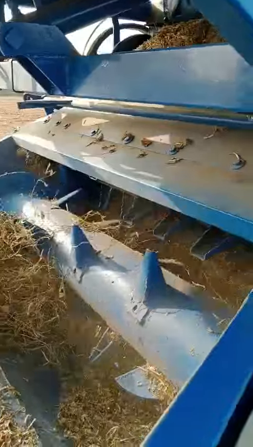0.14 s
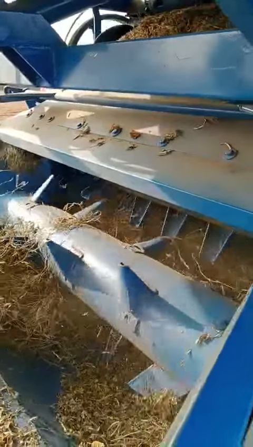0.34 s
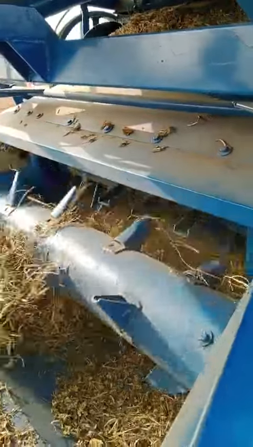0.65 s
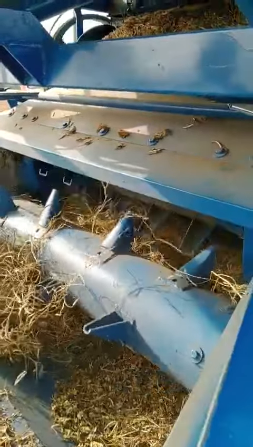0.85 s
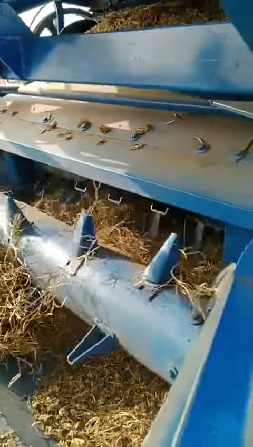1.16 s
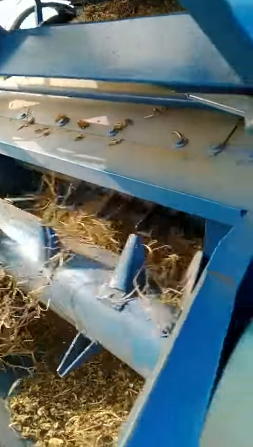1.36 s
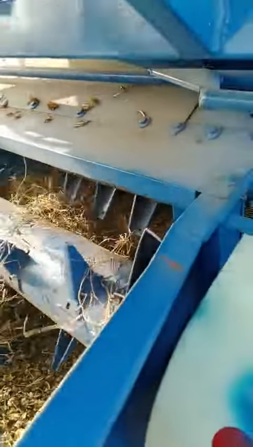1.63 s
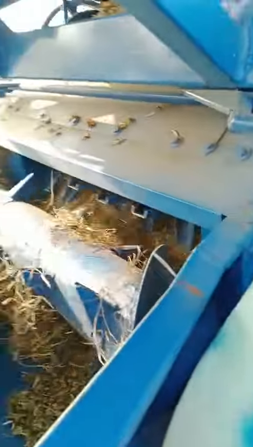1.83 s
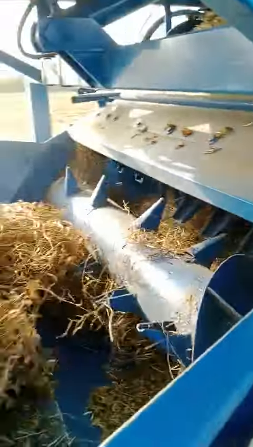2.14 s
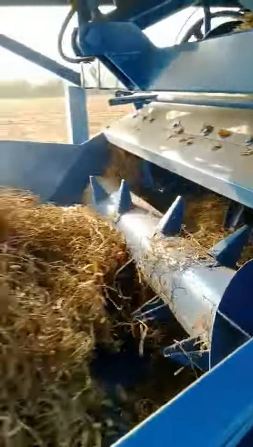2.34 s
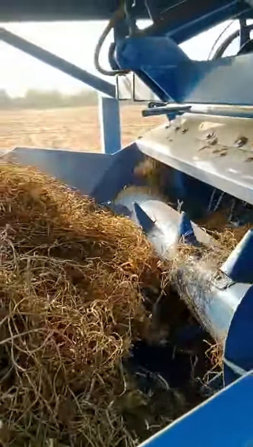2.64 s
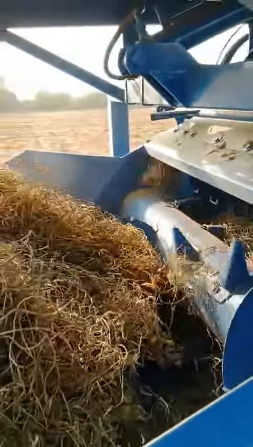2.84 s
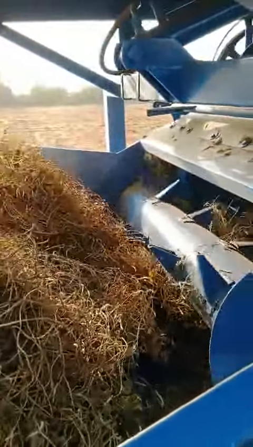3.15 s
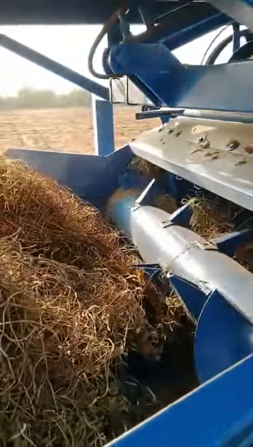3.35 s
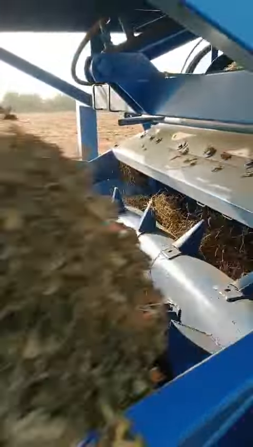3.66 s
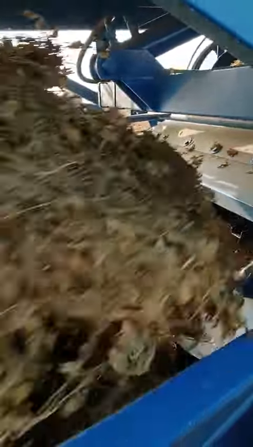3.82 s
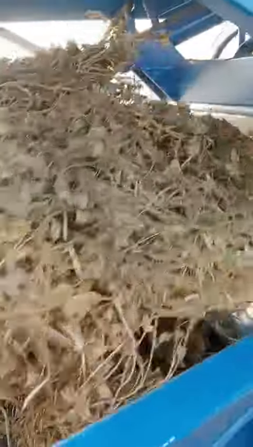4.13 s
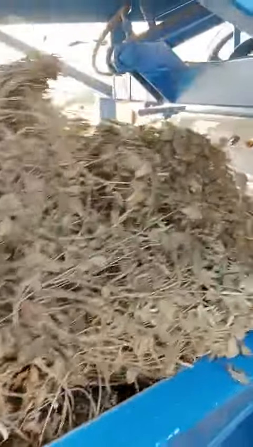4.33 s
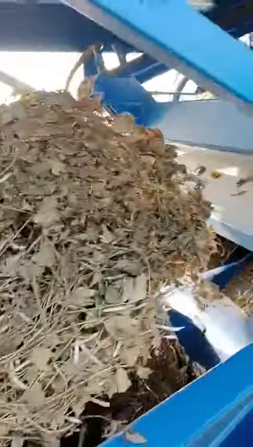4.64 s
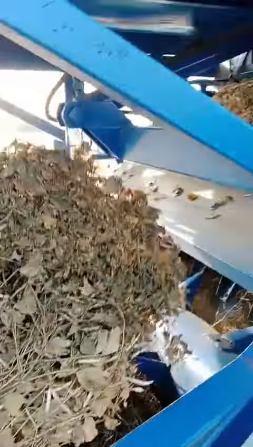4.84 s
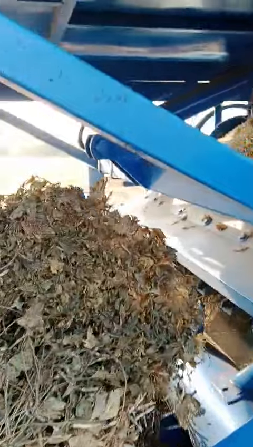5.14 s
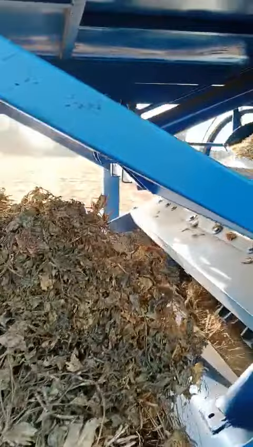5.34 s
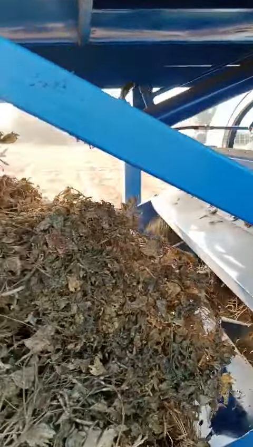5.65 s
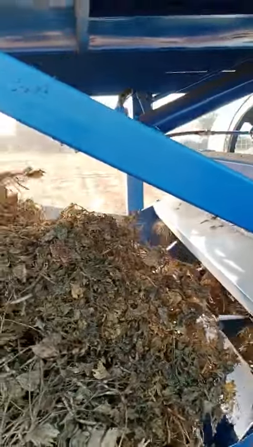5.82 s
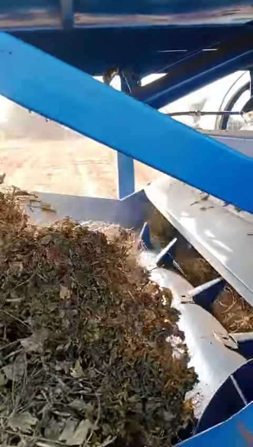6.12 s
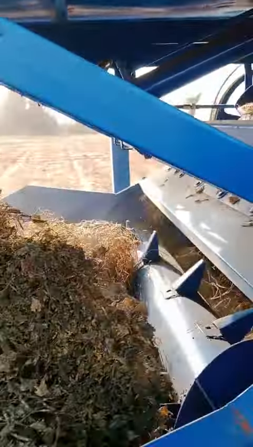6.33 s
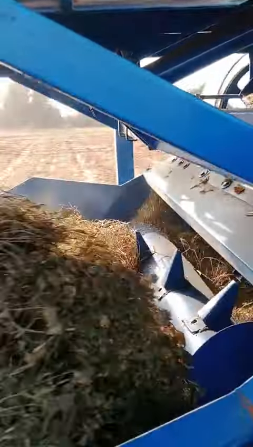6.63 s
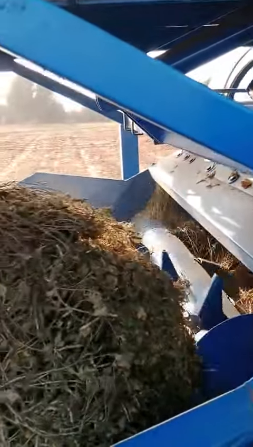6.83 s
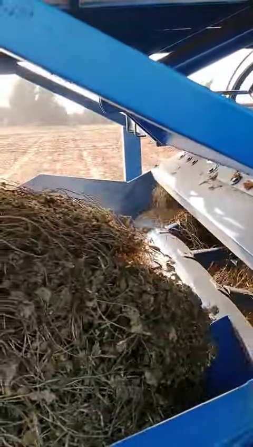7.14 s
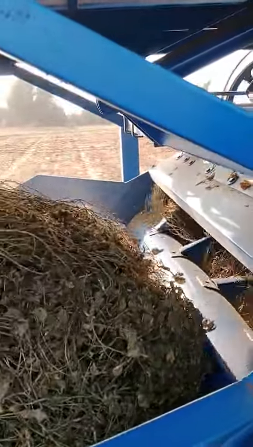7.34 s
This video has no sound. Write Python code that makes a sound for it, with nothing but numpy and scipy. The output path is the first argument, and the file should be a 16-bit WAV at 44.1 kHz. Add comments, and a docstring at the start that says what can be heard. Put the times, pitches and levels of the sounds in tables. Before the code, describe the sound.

Close to the feed opening of a threshing machine, outdoors with no echo, a continuous churning roar sits on a low diesel drone and a ringing metal hum. Early on, stalks snap and clods clack against the steel roller. Dry stems and leaves slide in with a brief rustle midway, then the drum works harder, with more thumps and clanks. A flickering hiss of chaff carries on throughout.

```python
"""Thresher in an open field

A tractor-driven thresher, heard close up from its feed tray. Under it all the blower rumbles,
the diesel drones, the shafts hum and the steel hood booms. Chaff hisses, an armful rustles in,
stalks crack, stems clank on the sieve and clods clack on the feed roller.
In front, crop roars through the drum, thumping the casing and setting its panels ringing."""
import sys
import numpy as np
from scipy import signal
from scipy.fft import rfft, irfft
from scipy.io import wavfile

SR = 44100
rng = np.random.default_rng(int(sys.argv[2]) if len(sys.argv) > 2 else 0)


def log_audio(samples):
    """Write samples as a 16-bit WAV file to the path given in sys.argv[1]."""
    # one column per channel
    frames = np.atleast_2d(samples).T
    # limit to full scale, then quantise
    limited = np.clip(frames, -1, 1)
    pcm = np.round(limited * 32767).astype(np.int16)
    wavfile.write(sys.argv[1], SR, pcm)


N = 329868
TIME = np.arange(N) / SR
FREQ = np.arange(N // 2 + 1) * SR / N


def undb(db):
    """Decibels to gain."""
    return 10 ** (np.asarray(db) / 20)


def unit(x):
    """Scale to rms 1."""
    return x / np.sqrt(np.mean(x ** 2))


def curve(table):
    """Automation: straight lines through (time, value) points."""
    return np.interp(TIME, *np.transpose(table))


def colour(x, spectrum):
    """EQ x through (frequency, gain) points, at rms 1."""
    hz, db = np.transpose(spectrum)
    gain = undb(np.interp(np.log(FREQ + 1), np.log(hz), db))
    return unit(irfft(rfft(x) * gain, N))


def walk(rate):
    """Smooth random motion at rms 1, changing about rate times a second."""
    return unit(irfft(rfft(rng.standard_normal(N)) * np.exp(-(FREQ / rate) ** 2), N))


def grains(rate, spread_db):
    """Tiny random impacts, rate a second, scattered in size by spread_db."""
    size = undb(spread_db * np.minimum(rng.exponential(size=N), 4))
    hits = rng.random(N) < rate / SR
    return unit(hits * size * np.sign(rng.standard_normal(N)))


def tone(hz, drift_hz, flutter_db):
    """A machine tone, a little unsteady in pitch and level."""
    phase = np.cumsum(hz + drift_hz * walk(4.01)) / SR + rng.random()
    return unit(np.sin(2 * np.pi * phase) * undb(flutter_db * walk(2.1)))


def swells(table, half_s):
    """Envelope of bell-shaped swells around (time, level) peaks."""
    return sum(undb(db) * np.exp(-((TIME - s) / half_s) ** 2) for s, db in table)


def bursts(times, levels_db, lengths, rise_s):
    """Envelope of brief bursts: each builds, holds for its length and dies away."""
    envelope = np.zeros(N)
    for s, db, length in zip(times, levels_db, lengths):
        age = np.maximum(TIME - s, 0)
        envelope += undb(db) * (1 - np.exp(-age / rise_s)) / (1 + (age / length) ** 3)
    return envelope


def ring(x, modes):
    """Steel driven by x rings in its (frequency, width, level) modes, at rms 1."""
    response = sum(undb(db) * 1j * FREQ * width / (hz ** 2 - FREQ ** 2 + 1j * FREQ * width)
                   for hz, width, db in modes)
    return unit(irfft(rfft(x) * response, N))


def strike(modes, length_s):
    """One blow on steel: its modes start together and die away."""
    age = TIME[TIME < length_s]
    return sum(undb(db) * np.exp(-np.pi * width * age) * np.sin(2 * np.pi * hz * age)
               * rng.choice([-1, 1]) for hz, width, db in modes)


def add(out, s, sound):
    """Mix a sound into out at s seconds."""
    start = int(s * SR)
    out[start:start + len(sound)] += sound[:N - start]


# Low, airy body of the blower: (frequency [Hz], gain [dB])
BLOWER_EQ = [(20, -52), (42, -35), (62, -12), (85, -7.5), (120, -2.5), (240, -2.5), (320, -2), (430, -11),
             (700, -18.5), (2000, -38)]
# Fader ride on its rumble: (time [s], level [dB])
BLOWER_LEVEL = [(0, -23), (.33, -22.5), (.45, -23.5), (.56, -19.5), (.85, -21), (1.15, -24.5), (2.9, -26.5),
                (5.3, -25), (6.1, -23.5), (7.48, -22.5)]

def blower(firing_hz, cylinders=4, throb_db=1):
    """Churned air rumbles, throbbing once in each engine cycle."""
    cycle = np.cumsum(firing_hz) / SR / cylinders
    throb = undb(throb_db * np.cos(2 * np.pi * cycle))
    return undb(curve(BLOWER_LEVEL)) * colour(rng.standard_normal(N) * throb, BLOWER_EQ)


# Slight wander of the engine speed: (time [s], firing rate [Hz])
FIRING_RATE = [(0, 50.8), (2.5, 50.98), (3.6, 50.65), (4.6, 51.07), (5.9, 50.94), (7.48, 50.54)]
# Harmonics of the drone: (multiple of the firing rate, level [dB])
EXHAUST_HARMONICS = [(1, -40.5), (2, -41), (3, -30.5), (4, -40), (5, -42), (6, -33), (10, -44.5)]
# Fader ride on the drone: (time [s], gain [dB])
EXHAUST_GAIN = [(0, 5), (.65, 3), (1.2, -2), (2.2, -3.5), (3.2, -1), (3.9, 0), (5.1, -4), (6.1, 4.5),
                (7.48, -1)]

def diesel(firing_hz):
    """The muffled exhaust drones on low harmonics of the firing rate."""
    drone = sum(undb(db) * tone(k * firing_hz, drift_hz=0.092 * k, flutter_db=3)
                for k, db in EXHAUST_HARMONICS)
    return undb(curve(EXHAUST_GAIN)) * drone


# Hum of the turning parts: (frequency [Hz], level [dB])
SHAFT_TONES = [(58.5, -47.5), (82.8, -37.5), (139.3, -39.5), (178.3, -44), (302, -42.5), (335, -36.5)]

def shafts():
    """The belt-driven drum, fans and shafts hum, each at its own pitch."""
    return sum(undb(db) * tone(hz, drift_hz=0.00374 * hz, flutter_db=4) for hz, db in SHAFT_TONES)


# Sustained boom of the hood: (time [s], level [dB])
HOOD_LEVEL = [(0, -28), (1.1, -34), (2.6, -31.5), (2.9, -30.5), (4.7, -31), (5.1, -29.5), (5.9, -32),
              (6.7, -27.5), (7.48, -34.5)]
# Close tones that beat inside the boom: (frequency [Hz], relative level [dB])
HOOD_TONES = [(356.6, 3.5), (369.5, -1)]
# The hood swelling into resonance: (peak time [s], level [dB])
HOOD_SURGES = [(.075, -24), (2.92, -21), (3.19, -20.5), (3.385, -18.5), (3.52, -22), (3.72, -23),
               (3.815, -20), (3.975, -19.5), (4.22, -21), (4.29, -23.5), (4.38, -19), (4.535, -22),
               (4.69, -19), (4.785, -20.5), (5.39, -24.5), (6.94, -23)]

def hood():
    """Shaken by the shafts, the hood booms: its main tone surges while close tones beat against it."""
    boom_db = curve(HOOD_LEVEL)
    beating = unit(sum(undb(db) * tone(hz, drift_hz=1.19, flutter_db=2.5) for hz, db in HOOD_TONES))
    surging = np.hypot(undb(boom_db - 1), swells(HOOD_SURGES, half_s=0.025))
    return undb(boom_db - 4.5) * beating + surging * tone(366, drift_hz=3.07, flutter_db=1.8)


# Crop dragging along the side panel: (peak time [s], level [dB])
PANEL_DRAGS = [(.79, -22), (1.15, -25.5), (2.28, -23.5), (3.57, -23), (4.30, -30), (5.18, -25),
               (6.56, -20.5)]

def side_panel(load_db):
    """Sheet steel sings one low note under load, swelling as crop drags along it."""
    envelope = np.hypot(undb(-36 + 0.58 * load_db), swells(PANEL_DRAGS, half_s=0.041))
    return envelope * tone(252.2, drift_hz=2.665, flutter_db=1.5)


# Fader ride on the chaff: (time [s], level [dB])
CHAFF_LEVEL = [(0, -33), (1.15, -35.5), (1.45, -32.5), (3.05, -37), (3.75, -29.5), (4.15, -35.5),
               (5.3, -38), (5.85, -34.5), (7.48, -34.5)]
# Its dry, wide hiss: (frequency [Hz], gain [dB])
CHAFF_EQ = [(1000, 10), (2600, -8.5), (3400, -1.5), (4300, -4.5), (5800, -4), (7400, 4.5), (10200, 3.5),
            (13000, 1), (15700, -6)]

def chaff():
    """Dry chaff flies off the drum in a flickering hiss with a faint crackle."""
    hiss = rng.standard_normal(N) + undb(-13) * grains(rate=800, spread_db=3.5)
    return colour(hiss, CHAFF_EQ) * undb(curve(CHAFF_LEVEL) + 3 + walk(22))


# Fade in and out of the armful's slide: (time [s], level [dB])
ARMFUL_LEVEL = [(3.37, -51), (3.46, -30), (3.8, -30), (3.95, -38), (4.2, -60)]
# Colour of its rustle: (frequency [Hz], gain [dB])
ARMFUL_EQ = [(300, -13), (800, 16), (1200, 10), (2500, -6), (3500, -2), (6000, -7), (10000, 7), (15500, -4)]

def armful():
    """Stems scrape and dry leaves rustle as a fresh armful slides onto the tray."""
    rustle = grains(rate=1600, spread_db=3) * undb(1.5 * walk(25))
    return undb(curve(ARMFUL_LEVEL)) * colour(rustle, ARMFUL_EQ)


# Stalks cracking in the feed: (time [s], snap level [dB], crunch level [dB], length [s])
STALK_CRACKS = [(0.123, -30, -43, 0.018), (0.471, -21.5, -19, 0.023), (0.5, -45, -33, 0.035),
                (0.933, -26, -27, 0.027), (1.988, -30, -50, 0.0048), (2.729, -29, -39, 0.013),
                (3.416, -27, -28, 0.012), (3.61, -24, -36, 0.004), (3.788, -17, -45, 0.002),
                (4.261, -29, -45, .003), (4.66, -33, -33, 0.017), (4.96, -38, -35, 0.041),
                (5.833, -31, -27, 0.029), (5.872, -21.5, -23.5, 0.02), (6.511, -28.5, -31, 0.023),
                (7.079, -28, -31, 0.024), (7.372, -35, -27.5, 0.028)]
# Bright top of a crack: (frequency [Hz], gain [dB])
SNAP_EQ = [(1500, -42), (4000, 4.5), (7500, 7), (11000, 7), (16000, -1.5)]
# Dull body of a crack: (frequency [Hz], gain [dB])
CRUNCH_EQ = [(300, 12), (900, 7.5), (2000, -5), (3600, 5), (6000, -6), (16000, -42)]

def stalks():
    """A breaking stalk is a tight burst of splinters: a bright snap over a dull crunch."""
    times, snap_db, crunch_db, lengths = np.transpose(STALK_CRACKS)
    bright = colour(grains(rate=5400, spread_db=0.5), SNAP_EQ)
    dull = colour(grains(rate=5000, spread_db=1.5), CRUNCH_EQ)
    snaps = bursts(times, snap_db + 1.5, lengths, rise_s=0.0021) * bright
    crunches = bursts(times, crunch_db + 2, lengths, rise_s=0.0052) * dull
    return snaps + crunches


# Ring of a sieve bar: (multiple of its pitch, width [Hz], level [dB])
BAR_MODES = [(0.27, 70, -4.5), (0.56, 60, -4), (0.78, 65, -1.5), (0.89, 130, -6), (1, 45, -2.5),
             (1.09, 110, -10), (1.5, 65, -7.5), (1.73, 120, -19)]

def clank(pitch_hz, bounces=4, gap_s=0.0058, step_db=-1.5, detune=0.018):
    """A stem skips along a sieve bar in weakening bounces, each at a slightly different pitch."""
    out = np.zeros(SR // 8)
    gaps = gap_s * rng.uniform(0.6, 1.4, size=bounces)
    for k, s in enumerate(np.cumsum(gaps) - gaps[0]):
        hz = pitch_hz * (1 + detune * rng.uniform(-1.04, 1))
        modes = [(multiple * hz, width, db) for multiple, width, db in BAR_MODES]
        add(out, s, undb(k * step_db) * strike(modes, length_s=0.035))
    return out


# Fader ride on the bed of light stems: (time [s], level [dB])
CLATTER_LEVEL = [(0, -34), (1.9, -40.5), (2.7, -41), (3.6, -40), (4.6, -43), (6.0, -43), (7.48, -40)]
# Accents from hard stems: (time [s], level [dB], pitch [Hz])
SIEVE_CLANKS = [(0.475, -21, 2180), (0.638, -27, 2330), (0.936, -23, 2390), (1.055, -24, 2080),
                (1.218, -27, 2350), (1.335, -26, 2170), (1.653, -32, 2160), (3.136, -24, 2010),
                (3.417, -20, 1590), (3.742, -25, 1730), (4.237, -24, 1960), (5.072, -26, 2140),
                (5.632, -23, 2010), (5.78, -30, 2020), (6.06, -26, 2020), (6.259, -22.5, 2020),
                (6.49, -23, 2060), (6.629, -18.5, 2010), (6.685, -32, 2100), (7.253, -21.5, 1940)]

def sieve(stems=260, centre_hz=1594, range_octaves=0.931, range_db=12):
    """Single loud clanks stand out from a loose clatter of lighter stems, each at its own pitch."""
    accents, clatter = np.zeros(N), np.zeros(N)
    for when, strength, pitch in rng.random((stems, 3)):
        pitch_hz = centre_hz * 2 ** (range_octaves * (pitch - 0.5))
        add(clatter, when * N / SR, undb(range_db * strength) * clank(pitch_hz))
    for s, db, pitch_hz in SIEVE_CLANKS:
        add(accents, s, undb(db - 2.7) * clank(pitch_hz))
    return accents + undb(curve(CLATTER_LEVEL)) * unit(clatter)


# Clods hitting a roller spike, some with a rebound: (time [s], level [dB], brightness [Hz])
ROLLER_CLACKS = [(0.474, -18, 7000), (.482, -22, 7000), (.497, -17, 2500), (.553, -16.5, 900),
                 (1.329, -22, 4000), (3.545, -19, 1000), (4.949, -23, 3500), (5.876, -21, 6000),
                 (6.629, -22, 4000), (6.684, -23, 4000)]
# Ring of the feed roller: (frequency [Hz], width [Hz], level [dB])
ROLLER_MODES = [(507, 13, -8.5), (905, 5, -5.5), (1347, 18, -7.5), (1430, 24, -2), (1830, 23, -11),
                (2400, 28, -22), (3225, 40, -11), (3650, 51, -15), (4130, 35, -10)]

def roller():
    """A hard blow rings all the roller's modes in a metal clack; a soft one wakes only the low ones."""
    out = np.zeros(N)
    for s, db, bright_hz in ROLLER_CLACKS:
        modes = [(hz, width, mode_db - 10 * np.log10(1 + (hz / bright_hz) ** 4))
                 for hz, width, mode_db in ROLLER_MODES]
        add(out, s, undb(db) * strike(modes, length_s=0.5))
    return out


# Hits from wads of crop: (time [s], casing level [dB], drum cover level [dB], length [s])
WAD_THUMPS = [(0.058, -25, -28, 0.082), (0.49, -26, -38, 0.099), (0.894, -20.5, -16, 0.061),
              (.934, -24, -30, 0.033), (1.323, -23, -21, 0.023), (1.353, -27.5, -18, 0.039),
              (1.85, -24, -29, 0.059), (1.938, -25, -23, 0.031), (2.703, -26, -20, 0.032),
              (2.727, -24, -21, 0.037), (3.071, -29.5, -23, 0.044), (4.243, -25.5, -43, 0.041),
              (4.94, -25, -35, 0.014), (5.915, -25, -19, 0.06), (6.087, -35, -18.5, 0.04),
              (6.63, -20, -32, 0.027), (6.685, -21.5, -20, 0.039)]
# Hollow ring of the steel casing: (frequency [Hz], width [Hz], level [dB])
CASING_MODES = [(494, 28, -4.5), (604, 64, -1), (737, 28, 0), (788, 56, 0.5), (880, 17, -10), (1107, 29, 2),
                (1532, 39, -5)]

def thumps():
    """Wads of crop thump the casing: bursts of hollow ring with some of the drum's roar in them."""
    times, casing_db, _, lengths = np.transpose(WAD_THUMPS)
    hollow = ring(rng.standard_normal(N), CASING_MODES)
    roar = colour(rng.standard_normal(N), ROAR_EQ)
    return bursts(times, casing_db - 1.5, lengths, rise_s=0.0016) * (hollow + undb(-5) * roar)


# Ring of the drum cover: (frequency [Hz], width [Hz], level [dB])
COVER_MODES = [(694.3, 12, -2), (724.5, 9.4, -9), (653.5, 9.3, -8), (1122, 24, -17)]

def drum_cover(load_db):
    """The sheet-steel cover rings roughly at each thump and buzzes harder as the load grows."""
    times, _, cover_db, lengths = np.transpose(WAD_THUMPS)
    blows = bursts(times, cover_db - 2, lengths, rise_s=0.0057)
    singing = sum(undb(db) * tone(hz, drift_hz=width / 2, flutter_db=2.5)
                  for hz, width, db in COVER_MODES)
    rough = unit(singing * undb(2.2 * walk(55)))
    buzz = ring(grains(rate=300, spread_db=0.5), COVER_MODES)
    return blows * rough + undb(-34 + 1.6 * load_db) * buzz


# Mid-heavy roar of crop in the drum: (frequency [Hz], gain [dB])
ROAR_EQ = [(40, -55), (150, -30), (380, -2.5), (650, -0.5), (1000, -1.5), (1500, -7), (2050, -14),
           (2550, -29), (3900, -17), (7000, -45), (16000, -49)]

def drum(load_db):
    """Beaters thrash the crop in uneven gulps; stems and grain pelt the casing."""
    thrashing = grains(rate=6000, spread_db=1.5) * undb(1.4 * walk(11) + 1.43 * walk(11.5))
    roar = colour(thrashing, ROAR_EQ)
    pelting = ring(grains(rate=450, spread_db=0) * undb(1.2 * walk(9.7)), CASING_MODES)
    gulps_db = 0.3 * walk(1.3)
    return undb(0.8 * load_db + gulps_db) * (undb(-28) * roar + undb(-31.5) * pelting)


# How hard the crop loads the drum, played relative to its mean: (time [s], level [dB])
CROP_LOAD = [(0, -27), (0.33, -24), (0.88, -23.5), (1.15, -26), (1.9, -27), (2.25, -28.5), (3.2, -26.5),
             (3.6, -26), (3.98, -30.5), (4.3, -26), (4.7, -28), (5.05, -24.5), (5.4, -26.5), (5.94, -21),
             (6.4, -22), (6.7, -22), (7.48, -24)]

def scene():
    """One load curve rides panels and drum together over the machine bed; close, with no echo."""
    load_db = curve(CROP_LOAD)
    load_db -= load_db.mean()
    firing_hz = curve(FIRING_RATE)
    bed = diesel(firing_hz) + blower(firing_hz) + shafts() + hood()
    panels = side_panel(load_db) + drum_cover(load_db)
    crop = drum(load_db) + thumps() + sieve() + roller() + chaff() + armful() + stalks()
    return (bed + panels + crop)[None]


# Hollows in the microphone's treble: (frequency [Hz], width [Hz], depth [0-1])
TREBLE_DIPS = [(9210, 490, 0.66), (11420, 600, 0.55), (13600, 850, 0.7)]

def record(dry, low_cut_hz=42, high_cut_hz=15750):
    """The microphone loses the deepest bass, has a null and hollows in the treble, and a steep top cut."""
    response = 1 / np.sqrt(1 + (low_cut_hz / (FREQ + 1)) ** 8)
    null = (4801, 977, 1)  # applied twice for a broader notch
    for hz, width, depth in [null, null, *TREBLE_DIPS]:
        response *= 1 - depth / (1 + (2 * (FREQ - hz) / width) ** 2)
    low_pass = signal.ellip(12, 0.1, 80, high_cut_hz, fs=SR, output="sos")
    return signal.sosfilt(low_pass, irfft(rfft(dry) * response, N))


dry = scene()
out = record(dry)
log_audio(out)
```